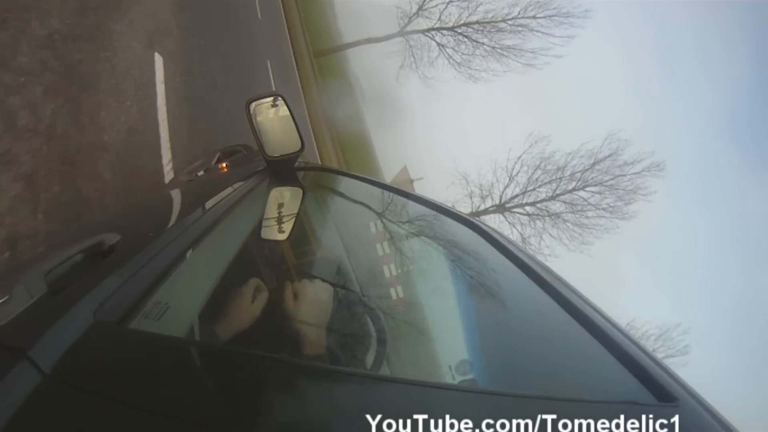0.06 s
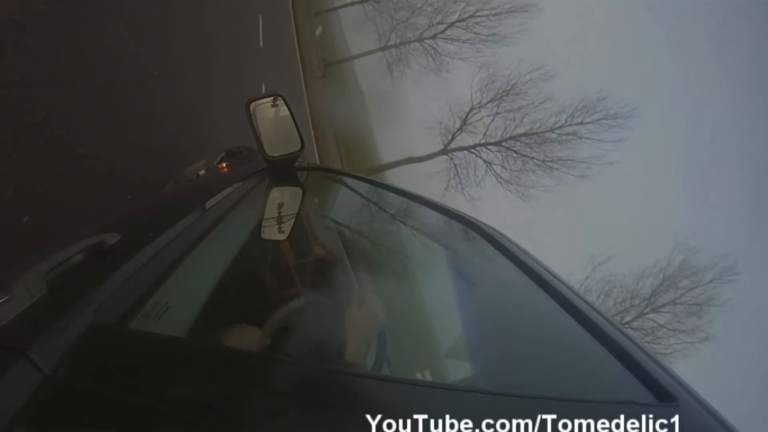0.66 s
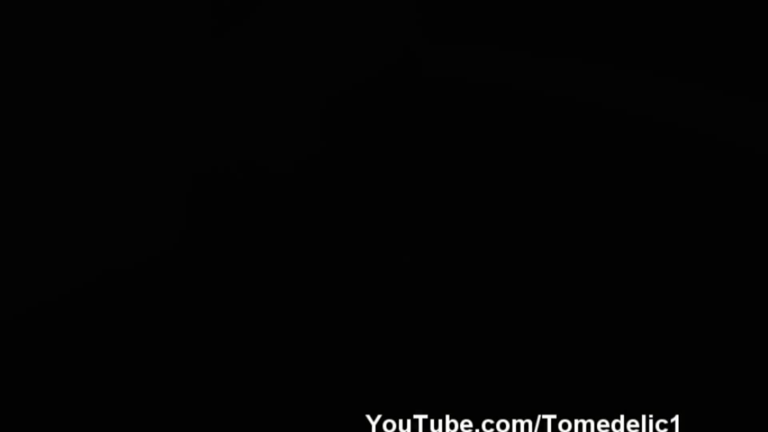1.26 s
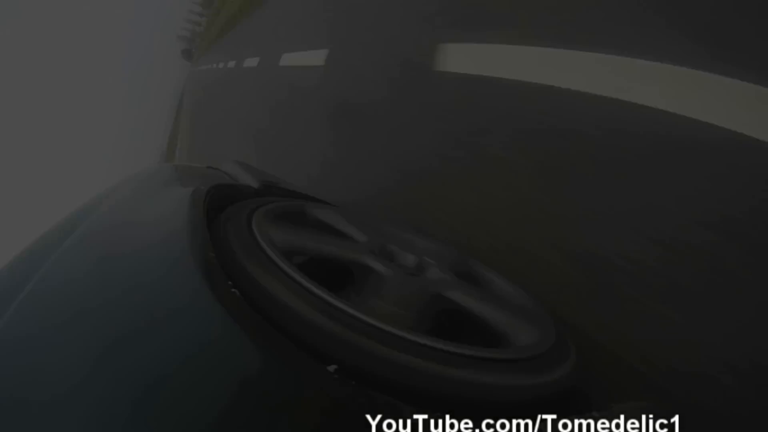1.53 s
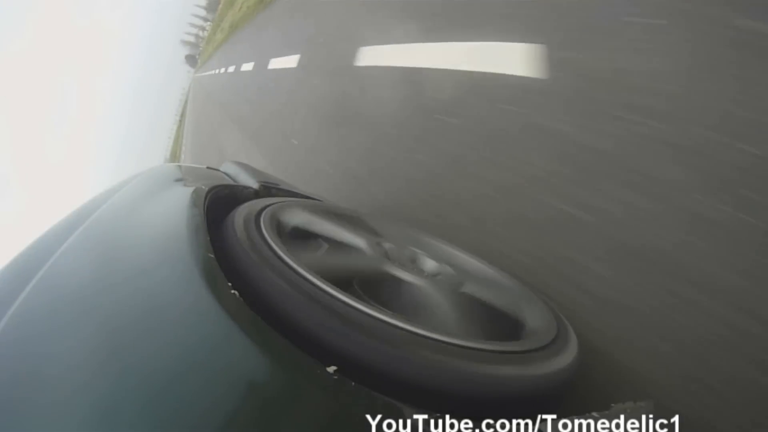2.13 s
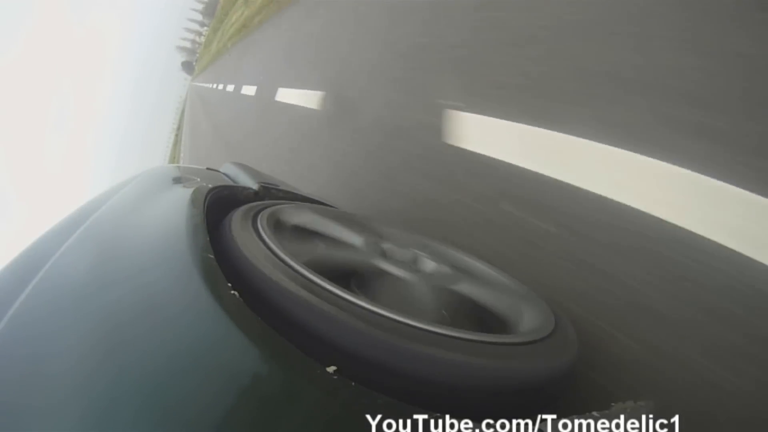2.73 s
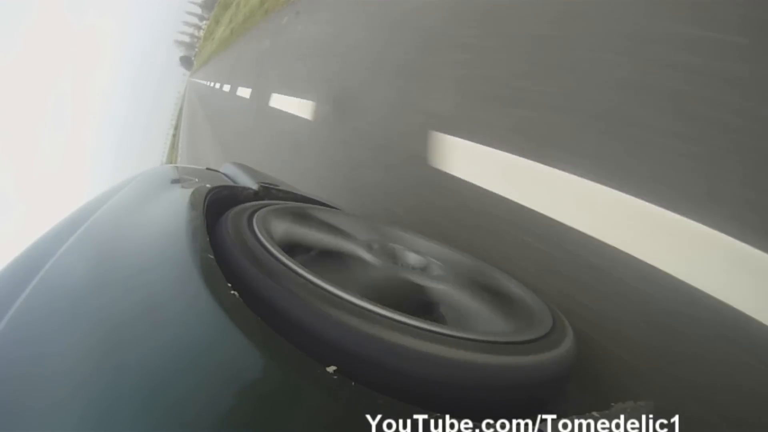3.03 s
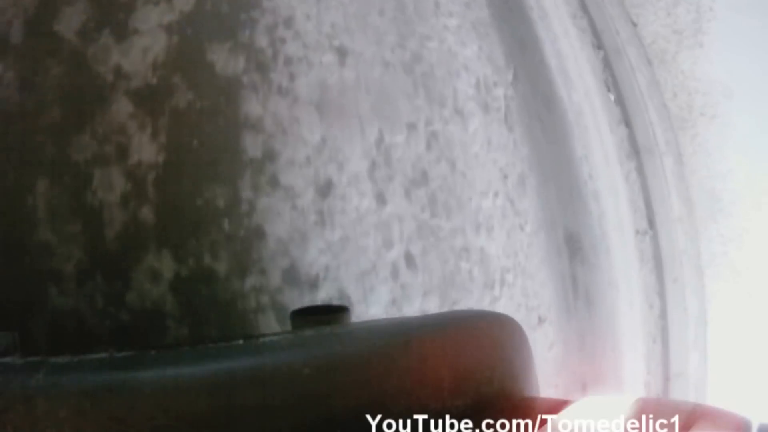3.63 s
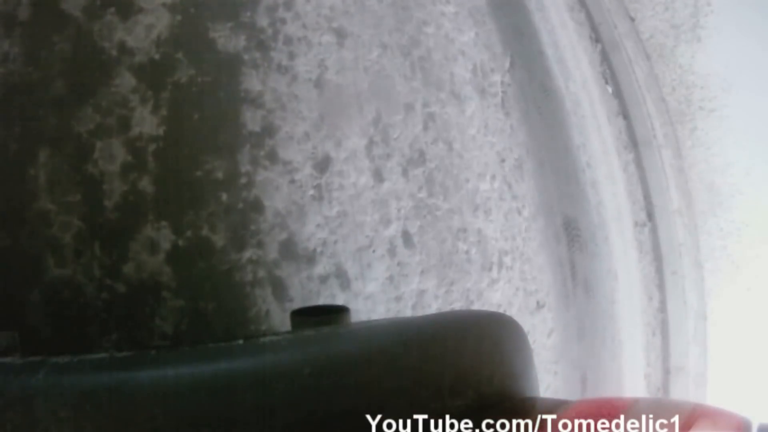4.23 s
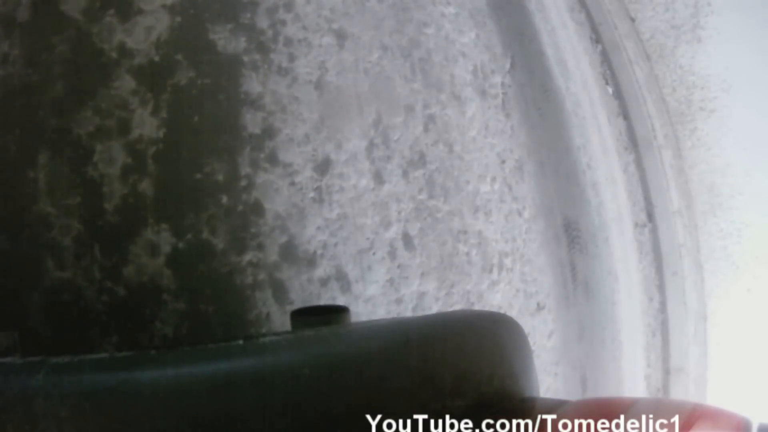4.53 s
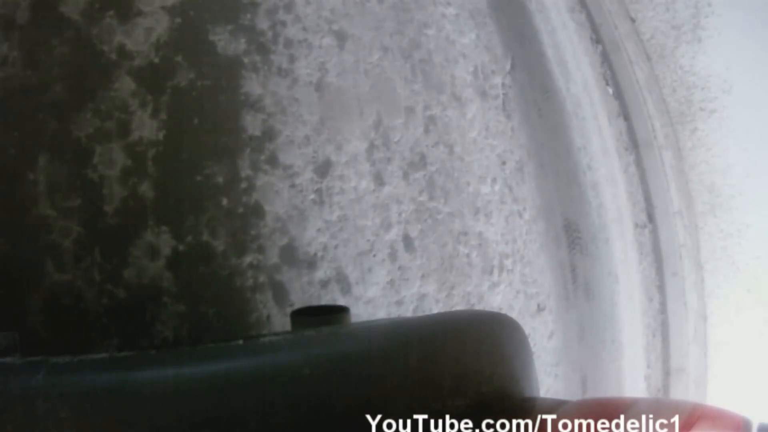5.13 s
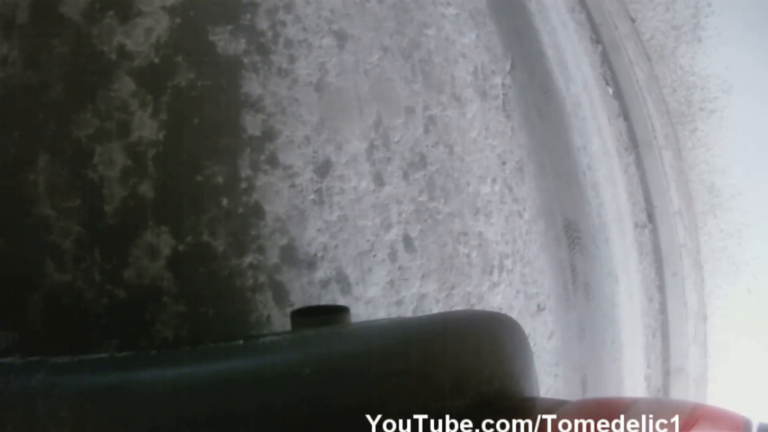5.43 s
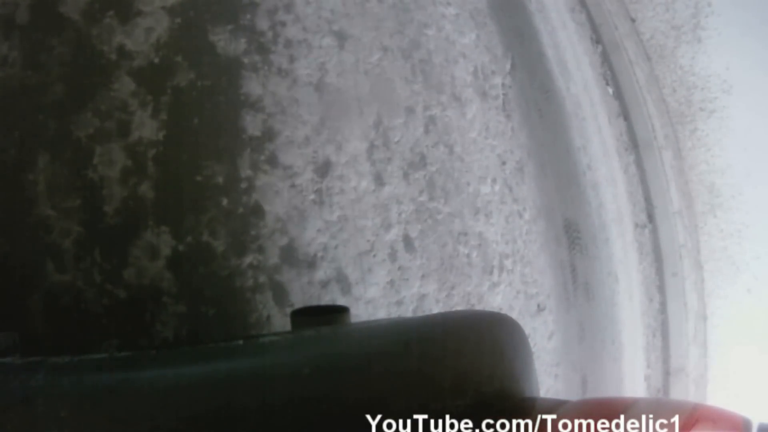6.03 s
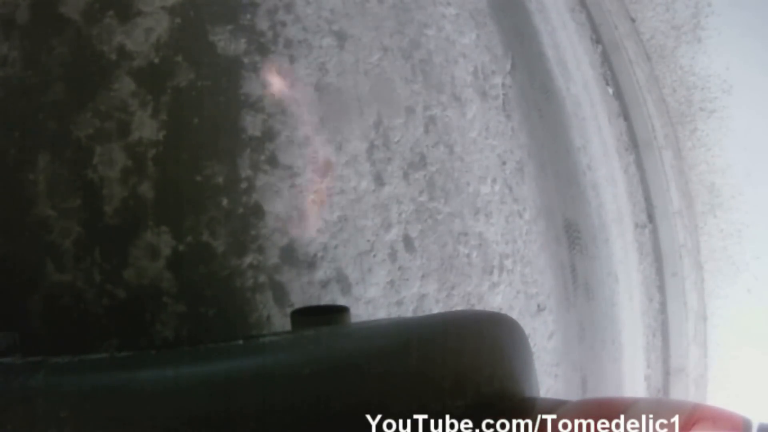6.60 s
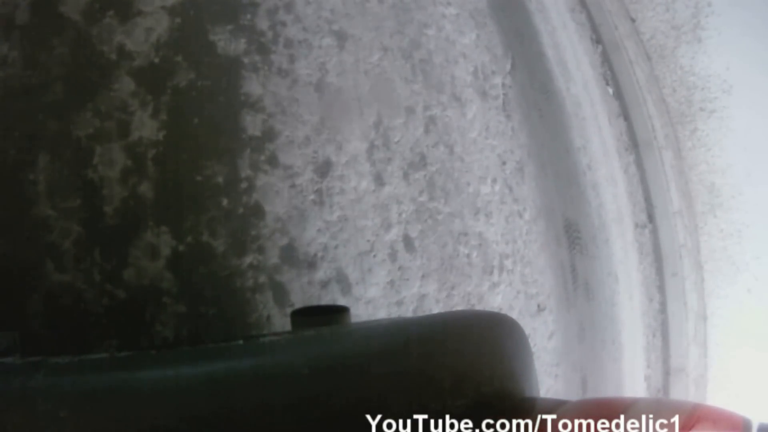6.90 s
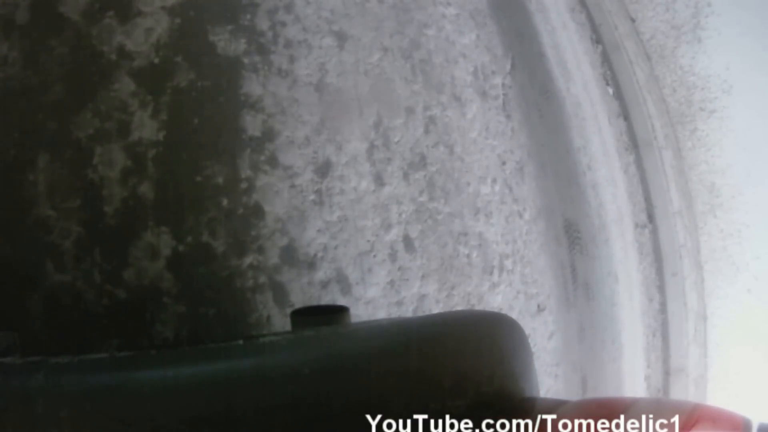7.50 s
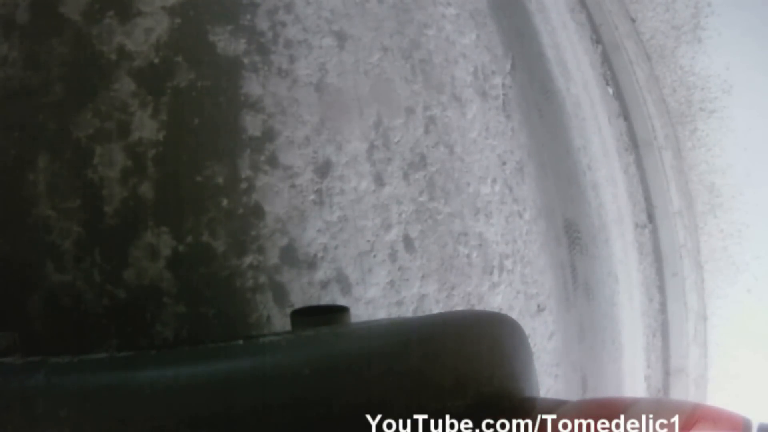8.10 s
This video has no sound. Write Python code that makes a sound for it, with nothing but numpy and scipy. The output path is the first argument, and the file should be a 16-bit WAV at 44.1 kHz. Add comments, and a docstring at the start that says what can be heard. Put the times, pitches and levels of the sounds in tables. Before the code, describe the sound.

A turbocharged four-cylinder car is heard from microphones on its body. The engine first drones low and rising under rushing air. A hard cut moves beside a wheel, where it eases off and accelerates through tyre roar, scrub and wind. Another cut lands at the tailpipe: the engine idles, then revs three times with thumps and crackles, a loud backfire and hiss of air launching the second rev.

```python
"""A turbocharged four-cylinder car, heard from three spots on its body, with hard cuts between them.
First, on the roof, the engine drones under a rush of air as the car pulls away. At 1.3 s, by the front
wheel, it eases off and accelerates through tyre roar, scrub and wind. From 3.6 s, at the tailpipe, it
idles, then is revved three times with thumps and crackles. One loud backfire and a rush of boost air
launch the second rev; the turbo spins down with a whoosh, and the last rev is pushed twice."""
import sys
import numpy as np
from scipy import signal
from scipy.fft import rfft, irfft, next_fast_len
from scipy.io import wavfile
from scipy.ndimage import uniform_filter1d

SR = 44100
rng = np.random.default_rng(int(sys.argv[2]) if len(sys.argv) > 2 else 0)


def int16_out(signal):
    """Quantize to a 16-bit WAV file."""
    q = np.round(np.clip(np.atleast_2d(signal).T, -1, 1) * 32767)
    wavfile.write(sys.argv[1], SR, q.astype(np.int16))


N = 368235
TIME = np.arange(N) / SR
ROOF_END_S, WHEEL_END_S, BANG_S = 1.314, 3.579, 5.681

# the steered tyre slides: start_s, end_s, extra_roar_db, scrub_db
SLIDES = [(1.254, 1.46, 2, -53), (2.044, 2.348, 3.5, -34), (2.564, 2.905, 1.5, -38)]
# pushes on the throttle: open_s, shut_s, top_firing_hz, hang_s, extra_bark_db, duck_db, duck_s,
# overrun_roughness (0-1), overrun_hiss_db; the overrun is the coasting after the throttle shuts
REVS = [(4.963, 5.388, 126.3, .01, 4.5, -4, 0.027, 0.66, 4),
        (5.695, 6.010, 156.2, 0.0061, 6, -25, 0.03, .98, 4),
        (6.621, 6.902, 159.2, 0, 7, -31, 0.0076, .5, 4), (6.900, 7.205, 251.1, .09, 3, -4.5, .045, 0.41, 7)]
# tone of rushing gas: frequency_hz, level_db
GAS_TONE = [(150, -11.5), (600, 9), (850, -3.5), (1200, -2), (1700, -2.5), (2200, 1.5), (2600, -2),
            (2950, 2), (3400, -5), (4100, -11.5), (4900, -9), (5500, -13.5)]


def undb(db):
    """Decibels to gain."""
    return 10 ** (np.asarray(db) / 20)


def curves(table):
    """Each column after the first, joined by straight lines in time."""
    times_s, *columns = np.transpose(table)
    return [np.interp(TIME, times_s, column) for column in columns]


def gate(start, end, attack_s, release_s):
    """Rises from 0 to 1 after start, holds, and falls back after end."""
    return np.clip(np.minimum((TIME - start) / attack_s, 1 - (TIME - end) / release_s), 0, 1)


def hump(age, peak_s):
    """Swells to 1 at the age peak_s and dies away."""
    u = np.maximum(age, 0) / peak_s
    return u * np.exp(1 - u)


def colour(x, tone):
    """Minimum-phase EQ through rows of frequency_hz, level_db, rolling off past both ends."""
    size = 16384
    hz, db = np.transpose(tone)
    log_hz = np.log(np.maximum(np.fft.rfftfreq(size, 1 / SR), 1))
    skirts = np.maximum(log_hz - np.log(hz[-1]), 0) + np.maximum(np.log(hz[0]) - log_hz, 0)
    cepstrum = irfft(np.log(undb(np.interp(log_hz, np.log(hz), db) - 20 * skirts)))
    cepstrum[1:size // 2] *= 2
    cepstrum[size // 2 + 1:] = 0
    return signal.oaconvolve(x, irfft(np.exp(rfft(cepstrum))))[:N]


def steady(x):
    """Rides the slow level to rms 1, leaving the fast detail."""
    size = SR // 8
    return x / np.sqrt(uniform_filter1d(uniform_filter1d(x ** 2, size), size) + 1e-14)


def walk(rate_hz):
    """Smooth random drift with a spread near 1."""
    hold = int(SR / rate_hz)
    held = rng.standard_normal(N // 100)[np.arange(N) // hold]
    return np.sqrt(2) * uniform_filter1d(uniform_filter1d(held, hold), hold)


def turbulence(tone, flutter_db, rate_hz):
    """Coloured noise of rms near 1 whose level flutters."""
    noise = colour(rng.standard_normal(N), tone)
    return noise / noise.std() * undb(flutter_db * walk(rate_hz))


def bursts(events, tone, decay_s):
    """A short puff of coloured noise for each row of start_s, level_db."""
    envelope = sum(undb(db) * (TIME >= s) * np.exp(-np.abs(TIME - s) / decay_s) for s, db in events)
    return .5 * envelope * steady(colour(rng.standard_normal(N), tone))


def roof_drone():
    """The engine comes through the body as a smooth, low, rising drone."""
    # the engine gathers speed: time_s, firing_hz
    speed = [(0.0, 67.7), (0.3, 74.3), (0.6, 80.35), (0.9, 85.1), (1.31, 97.6)]
    # first six harmonics of the firing rate: level_db
    harmonics = [-0.5, -11.5, -21.5, -34, -31, -33.5]
    hz, = curves(speed)
    phase = np.cumsum(hz) / SR
    drone = sum(undb(db) * np.sin(2 * np.pi * k * phase) for k, db in enumerate(harmonics, 1))
    return steady(drone) * undb(-20.5 + .3 * walk(28.5))


def roof_air(gain_db=15):
    """Air rushes softly over the roof."""
    # fader moves of the rush: time_s, relative_db
    fader = [(0.02, -51), (0.138, -53.5), (0.768, -49.5), (1.036, -56.5), (1.266, -52.5), (1.27, -55.5)]
    # its dark tone: frequency_hz, level_db
    tone = [(20, 15), (60, 19.5), (170, 17), (300, 11), (500, 10), (800, -4), (1600, -1.5), (2350, -5),
            (3000, -5), (3500, -18), (5500, -23)]
    air_db, = curves(fader)
    return undb(air_db + gain_db) * turbulence(tone, flutter_db=1, rate_hz=21.2)


def firings(hz, lope, rough, scatter_db, jitter):
    """Firing pulses and their phase; lope makes the cylinders differ, roughness varies every firing."""
    # the four cylinders in firing order: strength_db, lateness_periods
    cylinders = [(4.5, -0.0017), (0.5, 0.049), (0.5, -0.0033), (-1.5, -0.061)]
    phase = np.cumsum(hz) / SR
    count = np.arange(1, int(phase[-1]))
    timing_luck, level_luck = rng.standard_normal((N // 100, 2))[count].T
    lope, rough = (np.interp(count, phase, amount * np.ones(N)) for amount in (lope, rough))
    strength_db, lateness = np.array(cylinders)[count % len(cylinders)].T
    position = np.interp(count + lope * lateness + rough * jitter * timing_luck, phase, np.arange(N))
    size = undb(lope * strength_db + rough * scatter_db * level_luck)
    sample, part = position.astype(int), position % 1  # each pulse straddles two samples
    pulses = np.bincount(sample, size * (1 - part), N + 1) + np.bincount(sample + 1, size * part, N + 1)
    return pulses[:N], phase


def engine_bay():
    """Firings ring the engine bay beside the wheel; returns the sound and the firing phase."""
    # the speed hunts, then climbs: time_s, firing_hz
    speed = [(1.31, 211.3), (1.55, 237.3), (1.65, 235), (1.76, 222.6), (1.88, 242), (1.98, 231.9),
             (2.08, 195.7), (2.2, 192.8), (2.35, 203.7), (2.5, 219.5), (2.75, 234.4), (3.0, 254.9),
             (3.58, 265.4)]
    # the driver eases off in the bend, then accelerates out of it: time_s, level_db
    effort = [(1.32, -28.5), (1.55, -32.5), (1.75, -28.5), (1.95, -27), (2.12, -33.5), (2.35, -30.5),
              (2.6, -32), (3.15, -26.5), (3.58, -29)]
    # resonances of the bay: frequency_hz, level_db
    tone = [(60, -13), (150, 6), (240, 0), (350, -9), (450, 1), (530, 1), (640, 0.5), (800, -26.5),
            (1120, -7.5), (1400, -20), (2500, -21), (5000, -38)]
    hz, = curves(speed)
    effort_db, = curves(effort)
    pulses, phase = firings(hz, lope=1, rough=.4, scatter_db=3, jitter=.02)
    return steady(colour(pulses, tone)) * undb(effort_db), phase


def tyre_roar(firing_phase, fade_db_per_s=1.6):
    """The tyre roars on the asphalt, louder in each slide."""
    # tone of the roar: frequency_hz, level_db
    tone = [(100, 8.5), (200, 8), (350, 7.5), (560, 12), (800, -1), (1200, 1), (1700, -2), (2200, 1.5),
            (2900, 3), (3500, -5), (4200, -13.5), (5500, -12)]
    slide_db = sum(db * gate(start, end, attack_s=.073, release_s=.017) for start, end, db, _ in SLIDES)
    grip_db = -3 * hump(TIME - 2.35, peak_s=.06)  # the roar eases as the tyre grips again
    roar_db = -28 - fade_db_per_s * (TIME - ROOF_END_S) + slide_db + grip_db
    clatter = 1 + .055 * np.cos(np.pi * firing_phase)  # swells once per turn of the crank
    return undb(roar_db) * clatter * turbulence(tone, flutter_db=1, rate_hz=40)


def buffet(level_db, flutter_db, rate_hz):
    """Moving air buffets the microphone."""
    # low wind rumble: frequency_hz, level_db
    tone = [(12, -38), (25, -20.5), (42, 2), (80, -8), (120, -11), (250, -17), (600, -42.5)]
    return undb(level_db) * turbulence(tone, flutter_db, rate_hz)


def scrub():
    """Tread blocks slip sideways with an uneven, singing hiss."""
    # the narrow band where the tread sings: frequency_hz, level_db
    tone = [(1700, -22), (2150, 12), (2500, 7), (3000, -23)]
    slip = sum(undb(db) * gate(start, end, attack_s=.073, release_s=.19) for start, end, _, db in SLIDES)
    return slip * turbulence(tone, flutter_db=1, rate_hz=20)


def rev_speed(idle_hz=37.37, sag_hz_per_s=1.1, drag_per_s=.42):
    """Firing rate: it idles, climbs on open throttle, hangs a moment and is slowed by friction."""
    hz = idle_hz - sag_hz_per_s * (TIME - WHEEL_END_S)
    for opens, shuts, top_hz, hang_s, *_ in REVS:
        start_hz = np.interp(opens, TIME, hz)
        progress = np.clip((TIME - opens) / (shuts - opens), 0, 1)
        eased = progress + .0993 * progress * (1 - progress)
        climb_hz = start_hz + (top_hz - start_hz) * eased
        coast = np.exp(-drag_per_s * np.maximum(TIME - shuts - hang_s, 0))
        hz = np.where(TIME < opens, hz, climb_hz * coast)
    return hz


def engine_load(hz, full_lope_hz=170, hunt_hz=7.05, hiss_db_per_octave=9.5):
    """Exhaust texture and levels: smooth and loud when pushed, ragged and hissing on the overrun."""
    # exhaust balance by engine speed: firing_hz, throb_db, boom_db, bark_db
    balance = [(37, -18.5, -19, -32.5), (59.6, -14, -20.5, -32), (95, -28, -14, -32),
               (121, -16, -31, -23.5), (164, -14, -41, -21), (188, -15.5, -33, -21),
               (207, -20, -40.5, -17.5), (233, -30, -27, -15.5)]
    revs = np.array(REVS)
    latest = np.maximum(np.searchsorted(revs[:, 0], TIME) - 1, 0)
    opens, shuts, _, _, push_db, duck_db, duck_s, overrun_rough, overrun_hiss_db = revs[latest].T
    throttle = np.minimum(sum(gate(start, end, .02, .02) for start, end, *_ in REVS), 1)
    idle = (1 - throttle) * (TIME < revs[0, 1])
    overrun = 1 - throttle - idle
    # the level ducks briefly after the bang and thumps, as each rev starts
    dip_db = duck_db * hump(TIME - opens, duck_s)
    dip_db -= 10.5 * hump(TIME - shuts, peak_s=.028)  # the exhaust chokes as the throttle shuts
    dip_db -= 13 * np.exp(-np.abs(TIME - WHEEL_END_S) / .1)  # swells in after the cut
    burble = hump(TIME - shuts, peak_s=.068)
    rough = .73 * idle + .34 * throttle + overrun * overrun_rough + .083 * burble
    lope = np.minimum(hz / full_lope_hz, 1) * (1 - .29 * throttle)
    hunt_db = 3.5 * idle * np.cos(2 * np.pi * hunt_hz * (TIME - 3.83))
    hiss_swell = 1 - np.exp(-np.maximum(TIME - shuts, 0) / .083)
    flow_db = -51 + hiss_db_per_octave * np.log2(hz / 101.3) + hiss_swell * overrun_hiss_db
    balance_hz, *columns = np.transpose(balance)
    throb_db, boom_db, bark_db = (np.interp(hz, balance_hz, column) for column in columns)
    throb_db += dip_db + throttle  # 1 dB more on open throttle
    boom_db += dip_db
    bark_db += .56 * dip_db + throttle * push_db + hunt_db
    hiss_db = -49 * idle + (1 - idle) * flow_db + .16 * dip_db
    buffet_db = -26.5 * idle - 31.5 * throttle - 30 * overrun + 8.5 * burble
    return rough, lope, throb_db, boom_db, bark_db, hiss_db, buffet_db


def tailpipe():
    """Each firing pushes out a puff: a round throb, a silencer boom, a pipe bark and a hiss of gas."""
    # low resonances of the silencer: frequency_hz, level_db
    silencer = [(25, -36.5), (45, -27), (72, -5.5), (108, 2.5), (145, -12), (185, -9.5), (220, -19.5),
                (270, -35), (500, -63.5)]
    # resonances of the pipe: frequency_hz, level_db
    pipe = [(60, -42), (150, -0.5), (240, -4), (310, -3.5), (380, 0.5), (460, 5), (530, -1), (600, -11.5),
            (680, -29.5), (850, -28), (1100, -34), (1600, -48)]
    hz = rev_speed()
    rough, lope, throb_db, boom_db, bark_db, hiss_db, buffet_db = engine_load(hz)
    pulses, phase = firings(hz, lope, rough, scatter_db=4.5, jitter=.033)
    # one swing per firing, per crank turn and per engine cycle
    puff, crank, cycle = (np.cos(2 * np.pi * phase / period) for period in (1, 2, 4))
    throb = np.sqrt(2) * puff * (1 + .29 * lope * cycle) * undb(throb_db + 1.8 * rough * walk(50))
    boom = steady(colour(pulses, silencer)) * undb(boom_db)
    # ragged firings tear the flow, and that noise rings the pipe too
    torn = 1.9 * rough ** 1.4 * (1 + .35 * puff) * turbulence(pipe, flutter_db=2, rate_hz=40)
    ring = steady(colour(pulses, pipe)) + torn
    flutter = 1 + lope ** 4 * (.44 * cycle + .092 * crank)  # at speed the strong cylinder dominates
    bark = steady(ring * flutter) * undb(bark_db)
    hiss = undb(hiss_db) * (1 + .15 * puff) * turbulence(GAS_TONE, flutter_db=.87, rate_hz=45)
    return throb + boom + bark + hiss + buffet(buffet_db, flutter_db=1.5, rate_hz=15)


def thumps():
    """Gas thumps softly in the silencer, one swing of pressure at a time."""
    # the thumps: centre_s, peak_db, pitch_hz
    hits = [(3.612, -5, 89), (4.926, -4.5, 94), (4.977, -7, 83), (5.39, -8.5, 221), (5.482, -8, 60),
            (5.674, -6, 79), (6.049, -11, 75), (6.607, -3.5, 65.38), (7.312, -13, 64.95)]
    pressure = np.zeros(N)
    for centre_s, peak_db, pitch_hz in hits:
        angle = 2 * np.pi * pitch_hz * (TIME - centre_s)
        pressure += undb(peak_db) * angle * np.exp((1 - angle ** 2) / 2)
    return pressure


def crackles():
    """Gas crackles in the pipe, mostly just after the backfire."""
    # the pops: start_s, level_db
    pops = [(3.807, -35), (5.388, -28), (5.701, -13), (5.733, -17), (5.753, -31), (5.766, -13),
            (5.777, -35)]
    return bursts(pops, GAS_TONE, decay_s=.0024)


def ticks():
    """Small hard ticks under the car around the start of the first rev."""
    # the ticks: start_s, level_db
    hits = [(4.9287, -36), (4.9641, -47), (4.9801, -34), (5.0026, -36), (5.023, -38)]
    return bursts(hits, tone=[(900, 2), (3000, -1.5), (4800, -1)], decay_s=.0039)


def backfire(ring_hz=410, length_s=.0043, blast_db=14, crack_db=3):
    """Fuel explodes in the pipe: two violent swings at the pipe's pitch with a sharp crack."""
    age = np.maximum(TIME - BANG_S, 0)
    swing = -undb(blast_db) * np.sin(2 * np.pi * ring_hz * age)
    crack = undb(crack_db) * steady(colour(rng.standard_normal(N), GAS_TONE))
    return (age > 0) * np.exp(-(age / length_s) ** 4) * (swing + crack)


def blow_off(open_s=.25, attack_s=.057, sag_db_per_s=7.5):
    """Boost air escapes after the backfire: a broad rush and a bright valve whistle."""
    # whistling peaks of the valve: frequency_hz, level_db
    valve = [(1500, -3), (3000, 13), (4200, -15), (5150, -15), (5330, 9), (5500, -6)]
    rush = undb(-31) * turbulence(GAS_TONE, flutter_db=2, rate_hz=23)
    rush *= gate(BANG_S, BANG_S + open_s, attack_s, release_s=.21)
    whistle = undb(-39) * turbulence(valve, flutter_db=2.5, rate_hz=60)
    whistle *= gate(BANG_S, BANG_S + open_s, attack_s, release_s=.07)
    return (rush + whistle) * undb(-sag_db_per_s * np.maximum(TIME - BANG_S, 0))


def turbo_whoosh(start_s=6.02, end_s=6.59, sag_db_per_s=11):
    """Air streams from the slowing turbo between the second rev and the third."""
    # dull midrange of the whoosh: frequency_hz, level_db
    tone = [(530, -34), (900, -3), (1120, -6.5), (1350, -0.5), (2220, -1), (2980, -4.5), (4060, -21),
            (5000, -24), (6500, -49), (11000, -120)]
    fade = undb(-33.5 - sag_db_per_s * np.maximum(TIME - start_s, 0))
    envelope = fade * gate(start_s, end_s, attack_s=.1, release_s=.038)
    return envelope * turbulence(tone, flutter_db=.8, rate_hz=50)


def scene():
    """Hard cuts from roof to wheel to tailpipe; both channels are alike."""
    rear = crackles() + ticks() + tailpipe() + thumps() + backfire() + blow_off() + turbo_whoosh()
    roof = roof_drone() + roof_air()
    engine, firing_phase = engine_bay()
    wheel = engine + tyre_roar(firing_phase) + buffet(-30, flutter_db=1.6, rate_hz=14) + scrub()
    mono = np.select([TIME < ROOF_END_S, TIME < WHEEL_END_S], [roof, wheel], rear)
    return np.array([mono, mono])


def record(dry, band_hz=5500, hold_hz=12000, top_hz=15300):
    """A small camera's slow sample-and-hold mirrors the sound into a thin fizz; the bang overloads it."""
    narrow = signal.sosfilt(signal.butter(10, band_hz, fs=SR, output="sos"), dry)
    mirrored = narrow * (1 + 2 * np.cos(2 * np.pi * hold_hz * TIME))
    size = next_fast_len(N)
    treble_droop = np.sinc(np.fft.rfftfreq(size, 1 / SR) / hold_hz)
    held = irfft(rfft(mirrored, size) * treble_droop, size)[:, :N]
    overloaded = np.clip(held, -.85, .85)
    return signal.sosfilt(signal.ellip(10, .2, 80, top_hz, fs=SR, output="sos"), overloaded)


dry = scene()
out = record(dry)
int16_out(out)
```